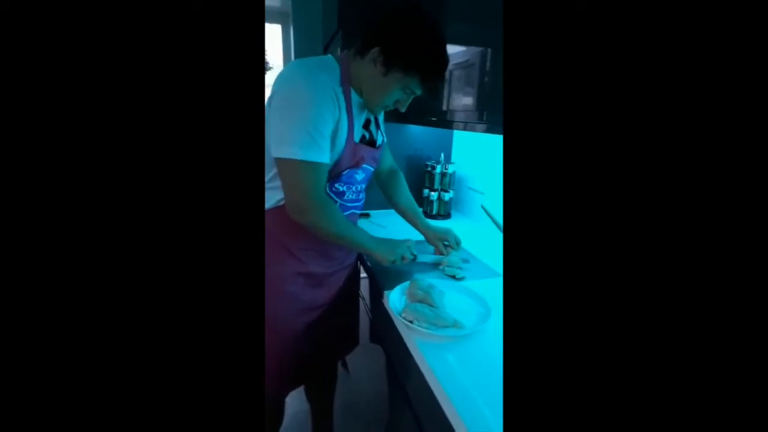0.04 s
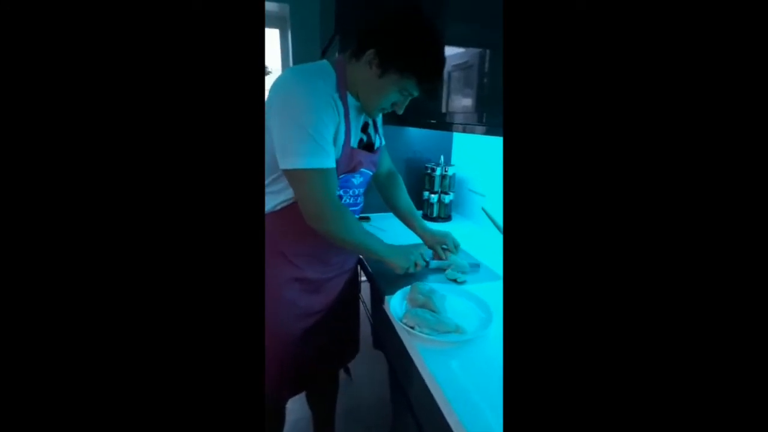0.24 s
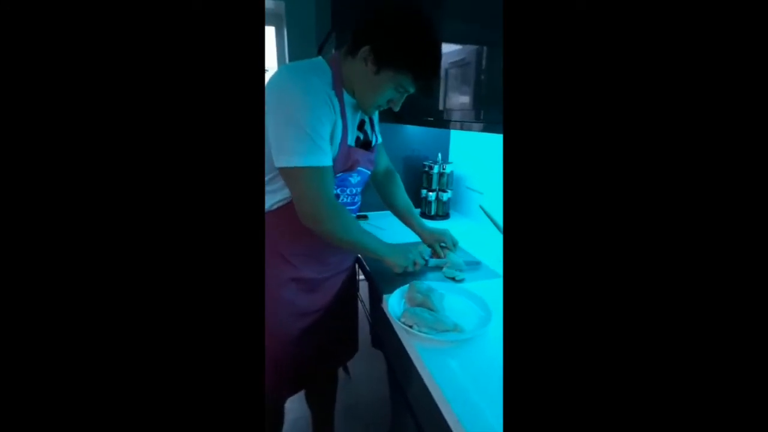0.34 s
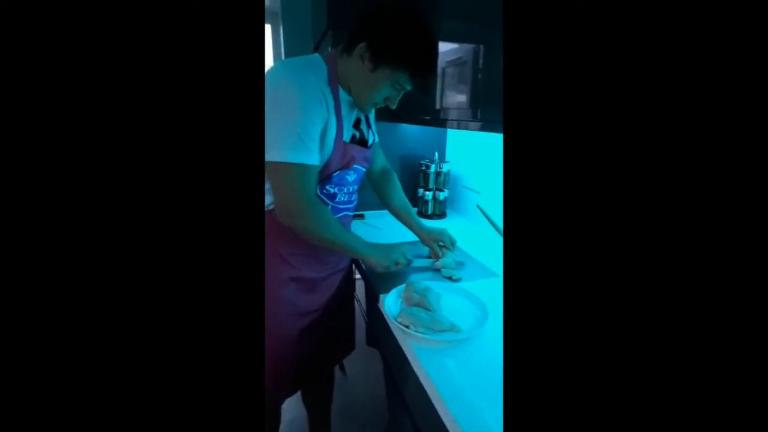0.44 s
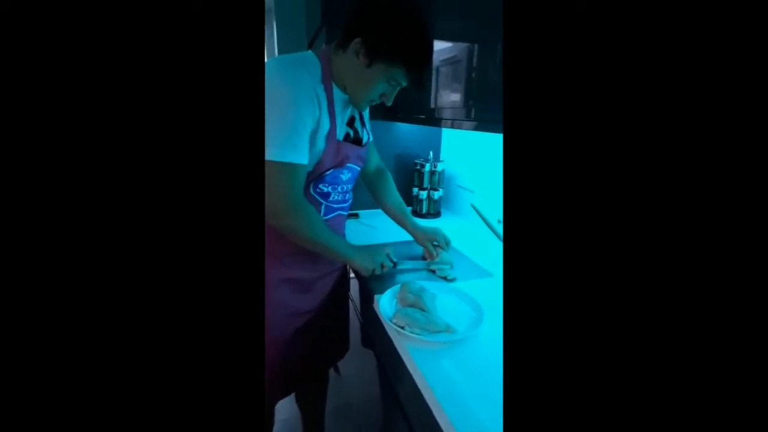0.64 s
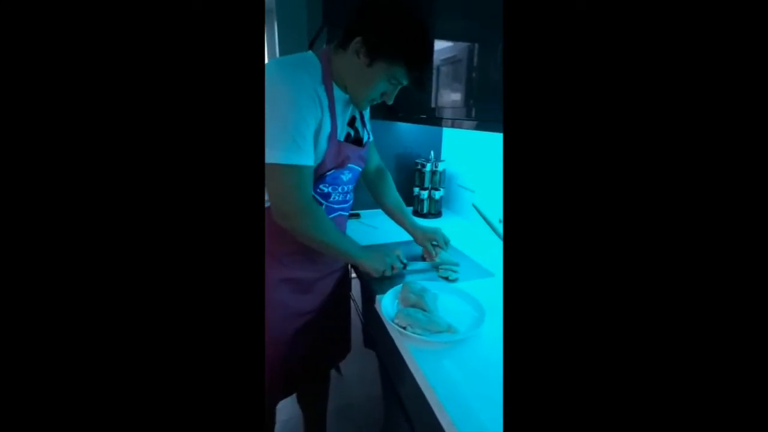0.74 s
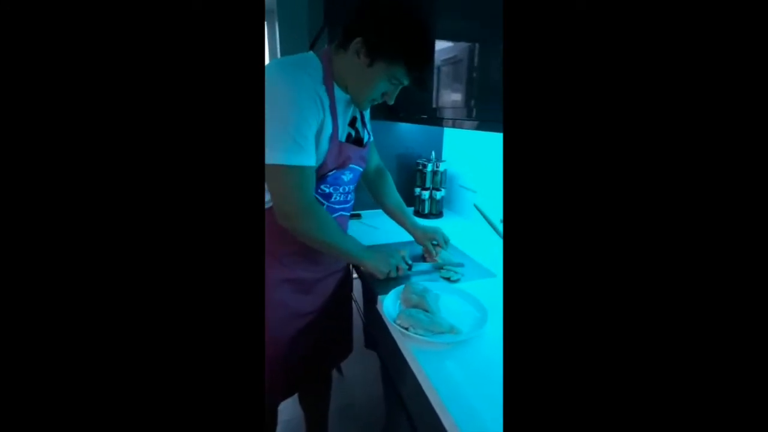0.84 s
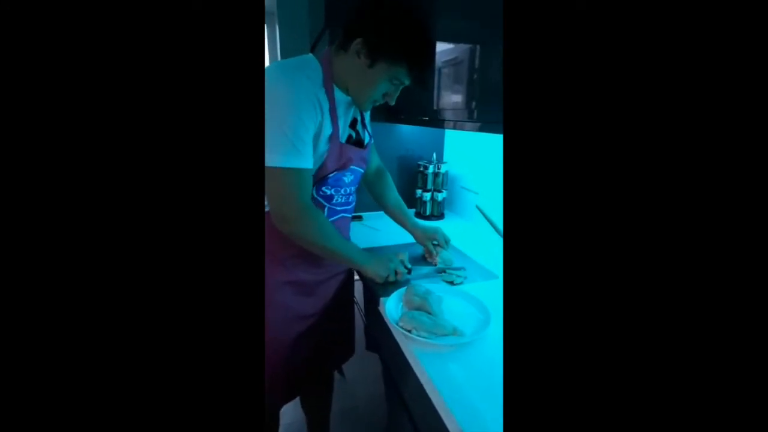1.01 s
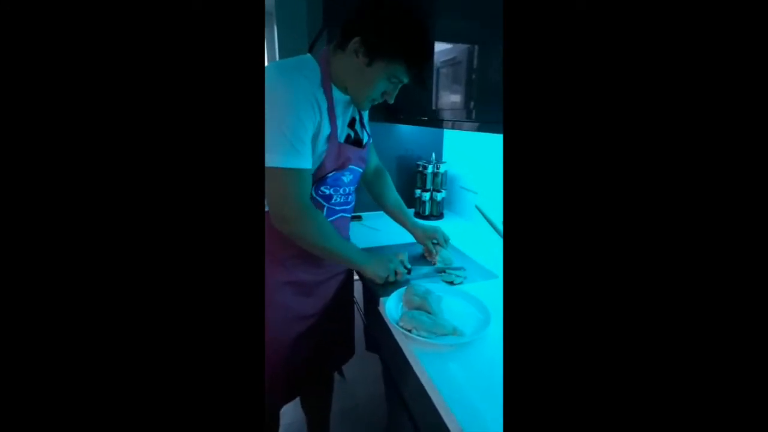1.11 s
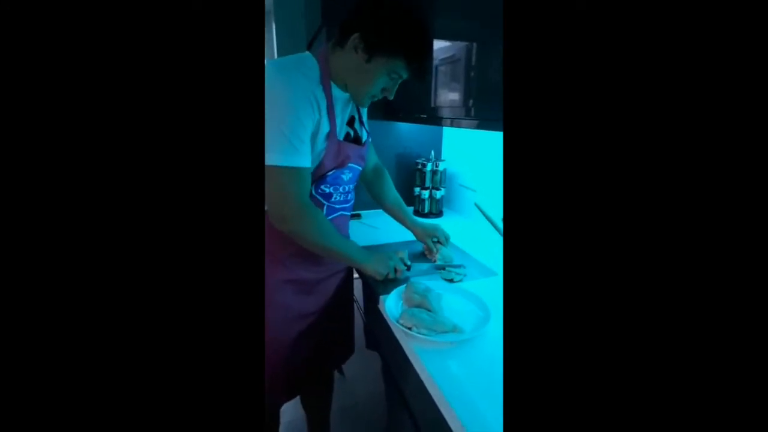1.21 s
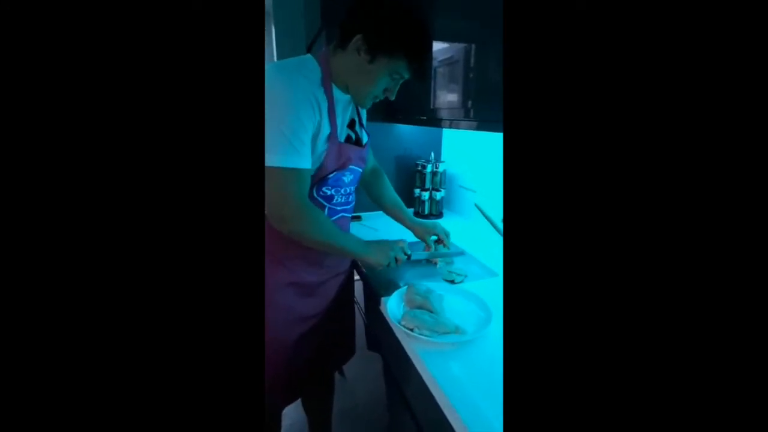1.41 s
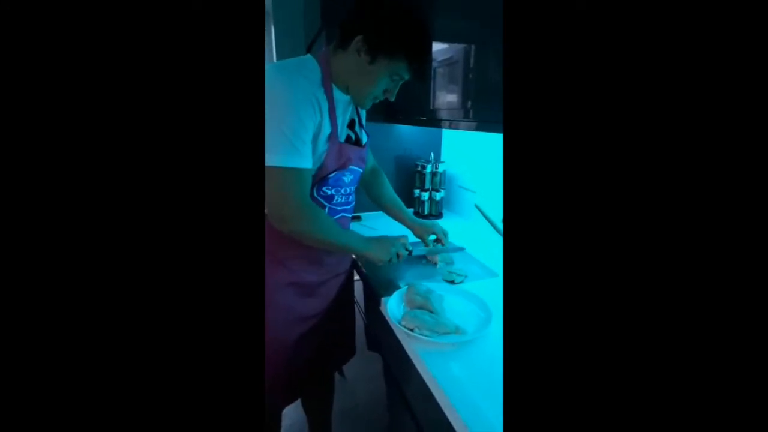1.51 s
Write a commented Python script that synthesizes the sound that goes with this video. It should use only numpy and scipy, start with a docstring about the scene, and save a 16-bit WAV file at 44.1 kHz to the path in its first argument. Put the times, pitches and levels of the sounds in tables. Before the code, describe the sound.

Close, bright knife strokes on a board: a knock with scraping, a pause, a double knock, then a strong metallic scrape and fading slide, over quiet appliance hum in a reverberant kitchen, picked up in stereo.

```python
"""A low hum and the air of a kitchen are heard first, with a soft thump and slide; then a knife works
through raw meat on a board in the hard, echoing room. Each stroke is a swarm of tiny random slips of the
edge that ring the blade and the board. The worktop thumps, a sum of damped low modes, when it is leaned on.
The hum of an appliance is two wavering sines; near the end a faint whine of two more sines sets in."""
import sys
import numpy as np
from scipy import signal
from scipy.fft import rfft, irfft, next_fast_len
from scipy.io import wavfile
from scipy.ndimage import uniform_filter1d, map_coordinates

SR = 44100
rng = np.random.default_rng(int(sys.argv[2]) if len(sys.argv) > 2 else 0)


def put_to_file(sound):
    """Save the sound as 16-bit audio at rate SR, in the file named by the first command-line argument."""
    columns = np.atleast_2d(sound).T  # one column per channel
    safe = np.clip(columns, -1, 1)
    whole_steps = np.round(safe * 32767)
    wavfile.write(sys.argv[1], SR, whole_steps.astype(np.int16))


def how_loud(loudness_db):
    """Turn decibels into a plain amplitude multiplier (0 dB gives 1, 20 dB gives 10)."""
    steps = np.asarray(loudness_db, float) / 20
    return 10 ** steps


N = 68355


def unit(x):
    """Normalisation to a root-mean-square value of 1."""
    return x / np.sqrt(np.mean(x ** 2) + 1e-20)


def along(points, hz):
    """Interpolation of (f/Hz, value) points on a logarithmic frequency axis."""
    f, value = np.transpose(points)
    return np.interp(np.log(hz + 1), np.log(f + 1), value)


def wobble(rate):
    """Random modulation: a smooth curve through random knots, rate of them a second."""
    knots = rng.standard_normal(int(N * rate / SR) + 4)
    return map_coordinates(knots, [np.arange(N) * rate / SR])


def filtered(x, response):
    """Linear filtering: the spectrum of x times a complex response of frequency."""
    size = next_fast_len(x.shape[-1] + 8192)
    spectrum = rfft(x, size) * response(np.fft.rfftfreq(size, 1 / SR))
    return irfft(spectrum, size)[..., :x.shape[-1]]


def causal(gain):
    """Minimum phase: folding the cepstrum onto positive time makes a causal response of this gain."""
    cepstrum = irfft(np.log(gain + 1e-6))
    half = len(cepstrum) // 2
    cepstrum[1:half] *= 2
    cepstrum[half + 1:] = 0
    return np.exp(rfft(cepstrum))


def paired(two, alike, gain=lambda hz: 1):
    """Interchannel coherence: mid and side weights set the likeness of left and right at each frequency."""
    def weights(hz):
        angle = np.arccos(np.clip(along(alike, hz), -1, 1)) / 2
        return gain(hz) * np.array([np.cos(angle), np.sin(angle)])

    mid, side = filtered(two, weights)
    return np.array([mid + side, mid - side])


def wavering_tones(tones, waver_db):
    """Amplitude modulation: a sum of sines of random phase, each wandering in level at random."""
    t = np.arange(N) / SR
    total = np.zeros(N)
    for hz, db in tones:
        level = np.sqrt(2) * how_loud(db + waver_db * wobble(14.24))
        total += level * np.sin(2 * np.pi * (hz * t + rng.random()))
    return total


def room_tone():
    """Diffuse background: coloured noise whose two sides are only partly coherent."""
    # spectrum of the air: f/Hz, relative spectral density/dB
    air_colour = [(15, -16), (40, -9.5), (70, -7), (110, -9), (166, -9.5), (277, -5), (488, -13),
                  (958, -28.5), (1600, -35.5), (4000, -39), (7000, -38.5), (9000, -44), (15900, -44.5)]
    # coherence of the sides: f/Hz, left-right likeness
    air_alike = [(40, 0.577), (80, 0.55), (200, 0.85), (500, 1), (2000, .2)]
    noise = rng.standard_normal((2, N))
    air = paired(noise, air_alike, lambda hz: how_loud(along(air_colour, hz)))
    return how_loud(-57.5) * unit(air)


def appliance_hum():
    """Tonal radiation of an appliance: two low sines with a slight amplitude waver."""
    # hum components: f/Hz, rms level before the waver/dB
    hum_tones = [(163, -65), (410, -65.5)]
    return wavering_tones(hum_tones, waver_db=0.8)


def worktop():
    """Modal decay: each soft push rings the low modes of the worktop, which die away exponentially."""
    # pushes: t/s, level applied to the whole set of modes/dB
    thumps = np.array([(0, -44.5), (0.185, -36.5), (0.377, -50.5)])
    # modes of the worktop: f/Hz, relative level/dB, t60/s
    thump_modes = [(93, 8.5, 0.22), (112, 9, 0.11), (146, -7, 0.17), (242, -3.5, 0.15), (302, 1, 0.045)]
    rise_s = 0.011
    t = np.clip(np.arange(N) / SR - thumps[:, :1], 0, None)  # time since each push
    ring = sum(np.sin(2 * np.pi * hz * t) * how_loud(db - 60 * t / t60) for hz, db, t60 in thump_modes)
    soft_onset = 1 - np.exp(-(t / rise_s) ** 2)
    return how_loud(thumps[:, 1]) @ (ring * soft_onset)


def ringing(hz, modes):
    """Resonance: the gain of a broad colour with resonant modes standing on it."""
    ring_db = 8  # raises every mode over the broad colour
    peaks = sum(how_loud(2 * (db + ring_db)) / (1 + (2 * (hz - centre) / width) ** 2)
                for centre, width, db in modes)
    return np.sqrt(1 + peaks)


def colour(hz, tilt_db, board_db, hiss_db):
    """Radiation of two resonators: tilted blade with more or less hiss, plus the lower voice of the board."""
    # broad colour of the blade: f/Hz, relative spectral density/dB
    blade_colour = [(300, -47.5), (600, -31.5), (900, -10.5), (1300, -3.5), (2500, -4), (3700, -8.5),
                    (4600, -13.5), (6000, -16), (7700, -14.5), (8600, -28.5), (11000, -25.5),
                    (15900, -26.5)]
    # resonances of the blade: f/Hz, width/Hz, relative level/dB
    blade_modes = [(1607, 40, -5), (1893, 35, -1), (2438, 40, -4), (2833, 60, -6), (2968, 40, -5),
                   (3153, 35, -4), (3390, 60, -6), (3690, 60, -3), (4562, 40, -3), (5231, 40, -4)]
    # broad colour of the board: f/Hz, relative spectral density/dB
    board_colour = [(120, -37), (300, -19), (430, -8), (550, -7.5), (900, -2), (1200, -6), (2200, -17),
                    (4000, -120)]
    # resonances of the board: f/Hz, width/Hz, relative level/dB
    board_modes = [(560, 70, 0), (695, 45, -2), (996, 30, -2), (1210, 60, 0), (1480, 60, 0)]
    tilt_top_hz, hiss_from_hz = 4280, 8270
    octaves = np.log2(np.clip(hz, 1, tilt_top_hz) / 2000)
    shading_db = tilt_db * octaves + hiss_db * (hz > hiss_from_hz)
    blade = unit(how_loud(along(blade_colour, hz) + shading_db) * ringing(hz, blade_modes))
    board = how_loud(board_db) * unit(how_loud(along(board_colour, hz)) * ringing(hz, board_modes))
    return causal(np.hypot(blade, board))


def evened(answer):
    """Spectral whitening: the same echoes without strong random colour of their own."""
    spectrum = rfft(answer)
    power = uniform_filter1d(np.abs(spectrum) ** 2, size=60, axis=1)  # smoothed over 60 bins
    return irfft(spectrum * [causal(1 / np.sqrt(p + 1e-9)) for p in power], answer.shape[1])


def room(x):
    """Reverberation: direct sound, earlier on the right, with early answers and a tail unlike on each side."""
    # reverberation time of the tail: f/Hz, t60/s
    reverberation = [(300, 0.33), (1000, 0.3), (3000, 0.33), (8000, 0.34), (14000, 0.26)]
    # coherence of the echoes: f/Hz, left-right likeness
    room_alike = [(150, 1), (350, 0.47), (700, 0.049)]
    tail_db, early_db, direct_db = -4.5, -5.5, -13
    early_t60_s, left_lag_s = 0.043, 0.00004
    hz, t, z = signal.stft(rng.standard_normal((2, SR // 2)), SR, nperseg=256)
    decay = how_loud(-60 * t / along(reverberation, hz)[:, None])
    tail = signal.istft(z * decay, SR, nperseg=256)[1]
    # answer of worktop and near walls
    early_decay = how_loud(-60 * np.arange(tail.shape[1]) / SR / early_t60_s)
    early = rng.standard_normal(tail.shape) * early_decay
    answer = how_loud(tail_db) * evened(tail) + how_loud(early_db) * evened(early)
    wet = signal.fftconvolve(x[None], paired(answer, room_alike), axes=1)[:, :len(x)]
    sides = np.array([[-1], [1]])  # half the lag on each side
    direct = filtered(x, lambda f: np.exp(1j * np.pi * f * left_lag_s * sides))
    return wet + how_loud(direct_db) * direct


def edge_slips(count):
    """Stick-slip friction: random impulses of either sign, with one blow of first contact near the start."""
    slips_per_s, slip_spread_db = 6000, 3
    blow_db, blow_s = 29, 0.0004  # over the rms of the slips; felt only when the stroke starts at once
    when, size, sign = rng.random((3, count))
    heights = how_loud(-slip_spread_db * np.log(1 - size))  # exponentially distributed in dB
    slips = unit((when < slips_per_s / SR) * heights * np.sign(sign - .5))
    slips[round(blow_s * SR)] = how_loud(blow_db)
    return slips


def knife():
    """Source-filter principle: slips under rise, hold and die-away drive the resonators and the room."""
    # strokes of the edge: t/s, rise/s, hold/s, die-away t60/s, drive level/dB, tilt/(dB per octave),
    # board over blade/dB, hiss/dB
    strokes = [(0, 0.00028, 0.0022, 0.46, -53, 5, 2.5, 6.5),
               (0.164, 0.014, 0.047, 0.057, -58, 20, 3.5, 6.5),
               (0.209, 0.0003, 0.005, 0.05, -27.5, -2, 2, 2),
               (0.217, 0.0071, 0.021, 0.14, -32, -4.5, -6, 5),
               (0.258, 0.0036, 0.031, 0.42, -40.5, -6.5, -9, 3.5),
               (.342, 0.00076, 0.047, 0.93, -36, -1, -8.5, 6),
               (0.392, 0.0017, 0.003, 0.31, -33, 5, -17, -4.5),
               (0.41, 0.038, 0.083, 0.24, -40, -1.5, -2.5, -0.5),
               (0.595, 0.017, 0.059, 0.081, -44, 7, 6.5, -2),
               (0.66, 0.00072, 0.017, 0.18, -26, 2, -8.5, -2.5),
               (0.676, 0.0019, 0.062, 0.065, -27.5, 0, -8.5, -2),
               (0.749, 0.0031, 0.043, 0.14, -40.5, -9, 0.5, -13),
               (0.819, 0.0041, 0.022, 1, -51.5, 3.5, -0.5, -10.5),
               (0.929, 0.022, 0.022, 0.075, -20, 3, -22, -3),
               (0.973, 0.0051, 0.0069, 0.034, -21, 2, -14, 3.5),
               (1.004, 0.0079, 0.13, 0.44, -48.5, 1, -3, -7),
               (1.132, 0.019, 0.025, 0.083, -40.5, -0.5, 5.5, -6)]
    chatter_db, chatter_per_s = 2, 200
    out = np.zeros((2, N + SR))
    t = np.arange(SR * 3 // 4) / SR
    for start, rise, hold, t60, db, *shade in strokes:
        slips = edge_slips(len(t))
        onset = np.clip(t / max(rise, 1 / SR), 0, 1) ** 2
        die_away = how_loud(-60 * np.clip(t - rise - hold, 0, None) / t60)
        chatter = chatter_db * wobble(chatter_per_s)[:len(t)]
        drive = slips * onset * die_away * how_loud(db + chatter)
        struck = filtered(drive, lambda hz: colour(hz, *shade))
        # new random echoes: each stroke is heard from a slightly new place
        out[:, round(start * SR):][:, :len(t)] += room(struck)
    return out[:, :N]


def whine():
    """Tonal radiation at high frequency: two faint unsteady sines under a linear fade-in."""
    # whine components: f/Hz, rms level before the waver, once faded in/dB
    whine_tones = [(3402, -74.5), (3745, -82)]
    from_s, rise_s = 1.26, 0.26
    fade_in = np.clip((np.arange(N) / SR - from_s) / rise_s, 0, 1)
    return wavering_tones(whine_tones, waver_db=2) * fade_in


def scene():
    """Superposition: the pressures of knife, worktop and kitchen add."""
    return knife() + worktop() + room_tone() + appliance_hum() + whine()


def band_limit(x):
    """A steep low-pass at the top of the band."""
    return signal.sosfilt(signal.butter(12, 16110, fs=SR, output="sos"), x)


def record(dry):
    """Transducer response: a microphone pair with bass roll-off, unequal colour and a band limit."""
    # colour of the pair: f/Hz, left minus right/dB
    nearer_left = [(300, -0.5), (1000, -0.5), (2800, -3), (5600, 2), (10000, -1.3), (14000, 2.5)]
    low_hz, top_hz = 72, 16100

    def microphones(hz):
        u = 1j * hz / low_hz
        bass_cut = (u ** 2 / (1 + np.sqrt(2) * u + u ** 2)) ** 2  # two second-order high-passes
        balance = how_loud(along(nearer_left, hz) * np.array([[.5], [-.5]]))
        return bass_cut * (hz < top_hz) * balance

    return band_limit(filtered(dry, microphones))


dry = scene()
out = record(dry)
put_to_file(out)
```